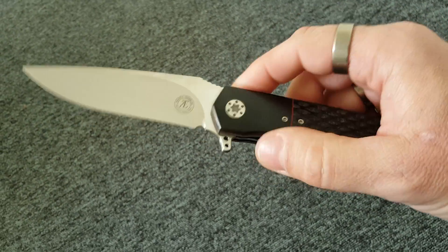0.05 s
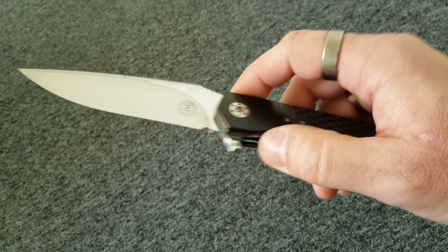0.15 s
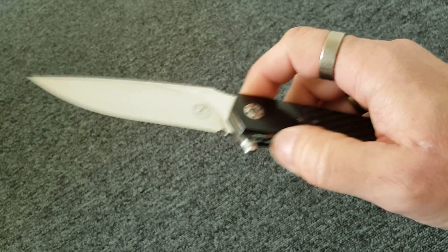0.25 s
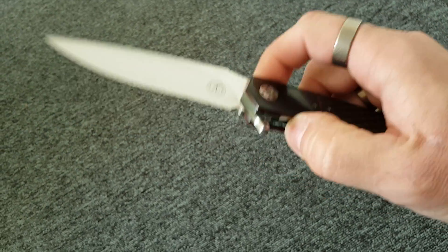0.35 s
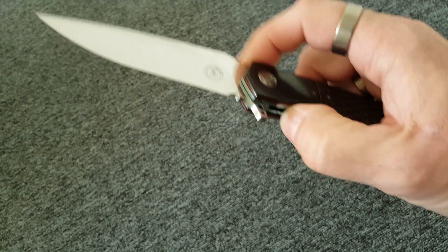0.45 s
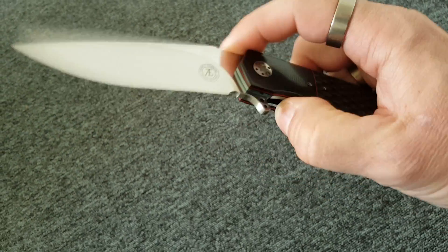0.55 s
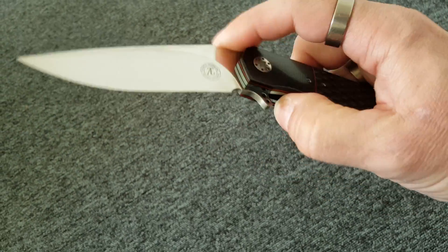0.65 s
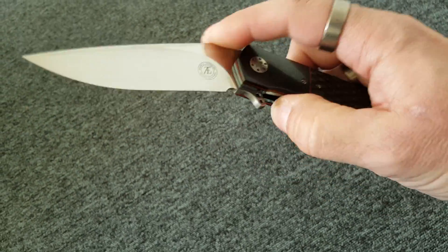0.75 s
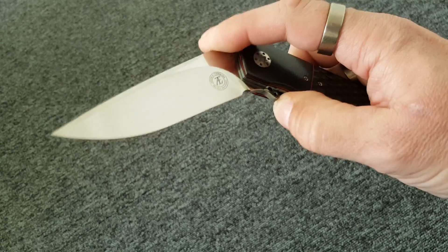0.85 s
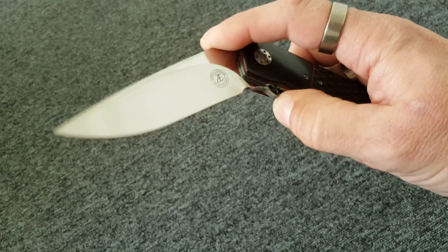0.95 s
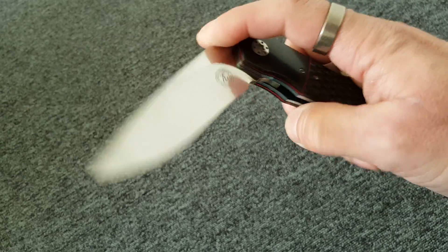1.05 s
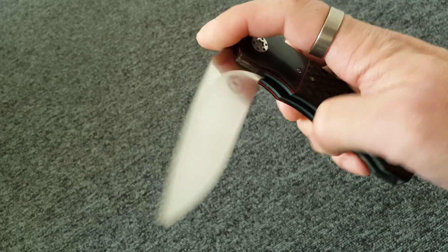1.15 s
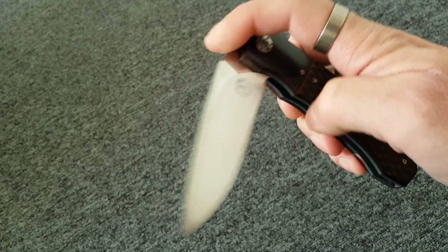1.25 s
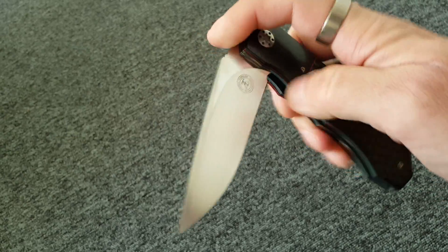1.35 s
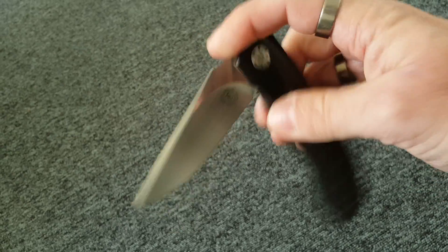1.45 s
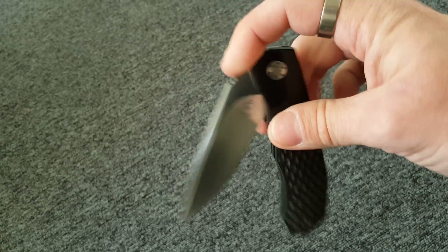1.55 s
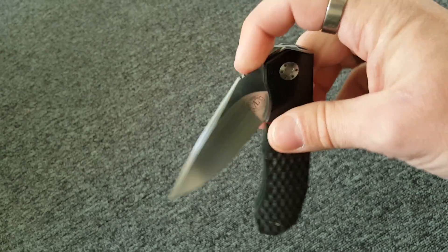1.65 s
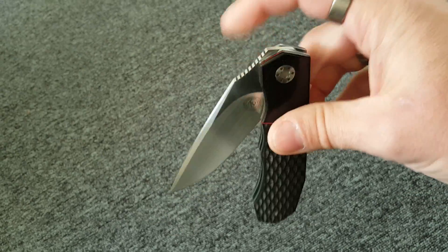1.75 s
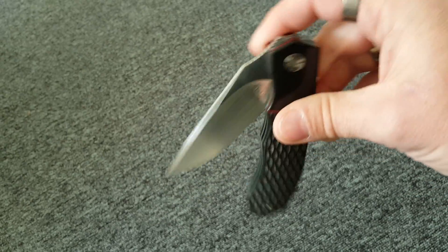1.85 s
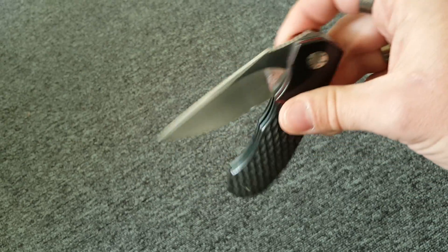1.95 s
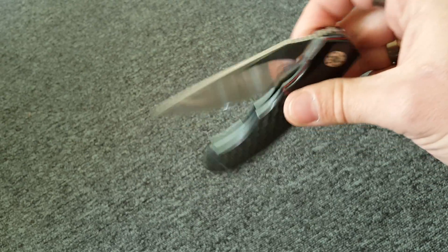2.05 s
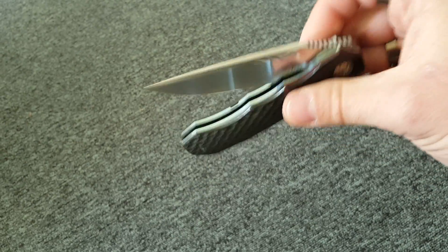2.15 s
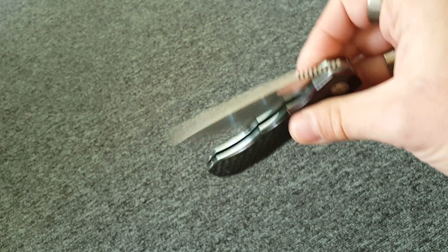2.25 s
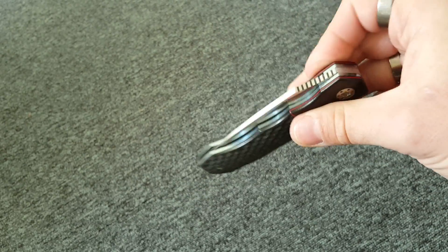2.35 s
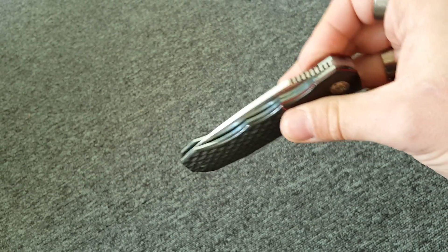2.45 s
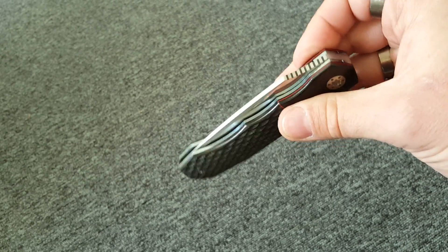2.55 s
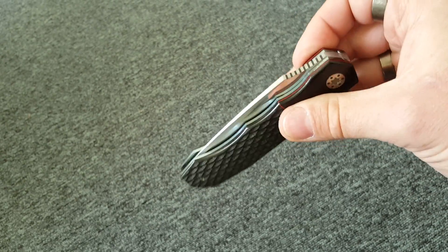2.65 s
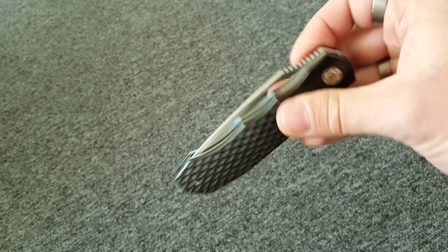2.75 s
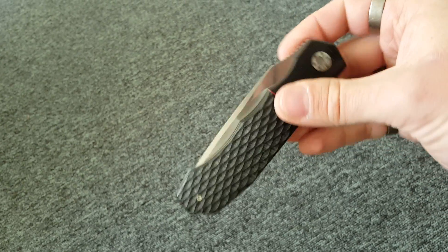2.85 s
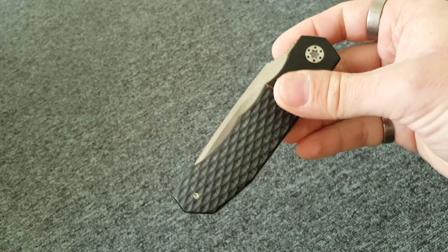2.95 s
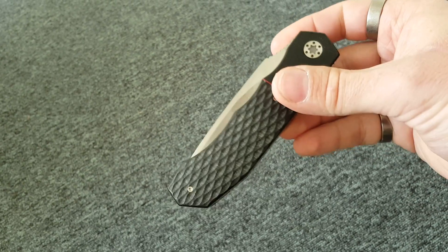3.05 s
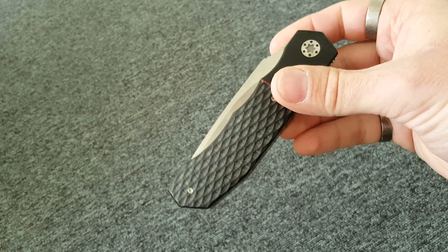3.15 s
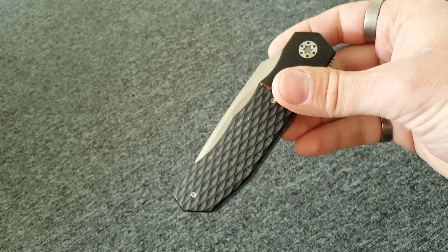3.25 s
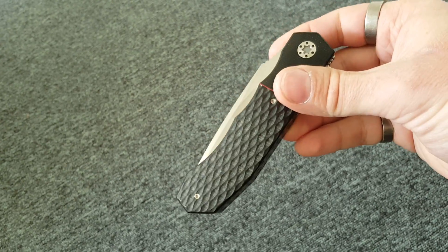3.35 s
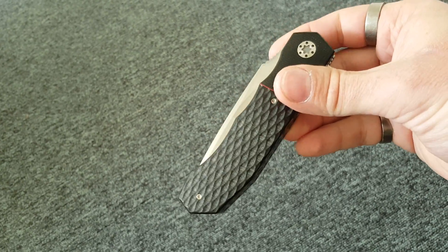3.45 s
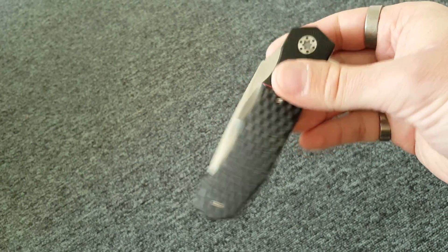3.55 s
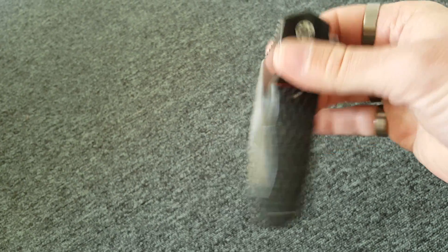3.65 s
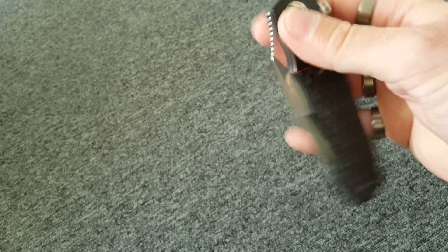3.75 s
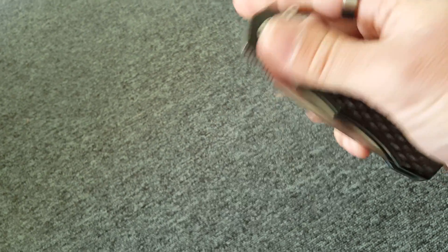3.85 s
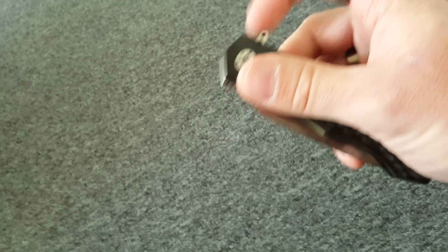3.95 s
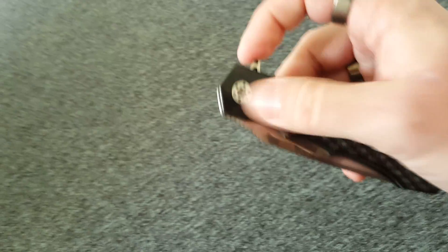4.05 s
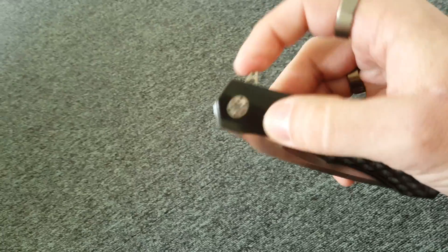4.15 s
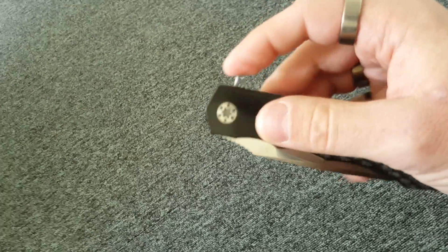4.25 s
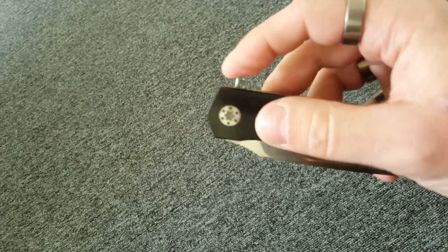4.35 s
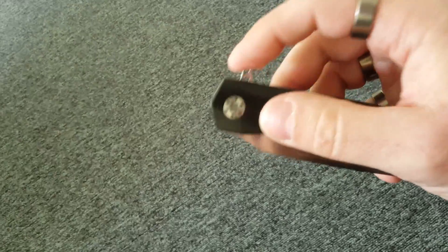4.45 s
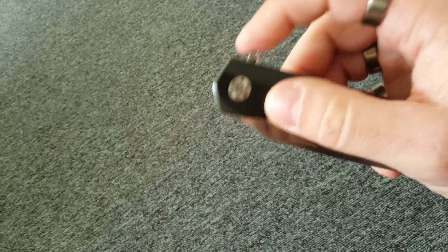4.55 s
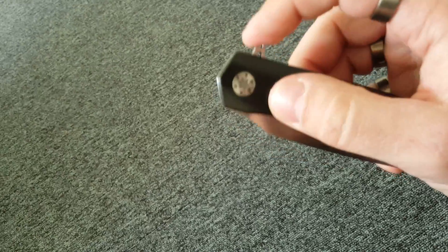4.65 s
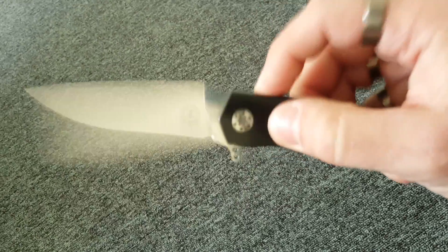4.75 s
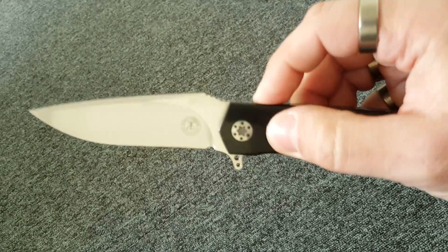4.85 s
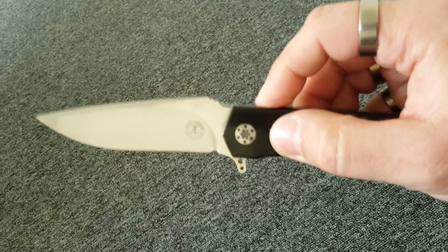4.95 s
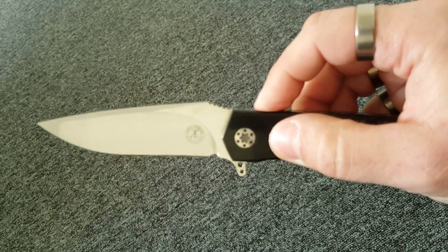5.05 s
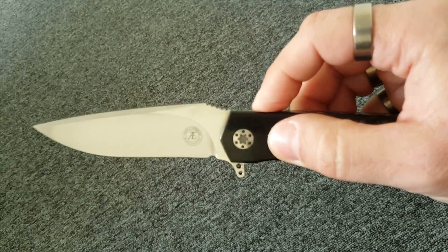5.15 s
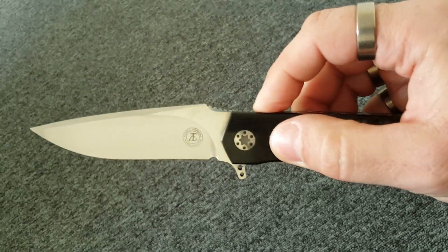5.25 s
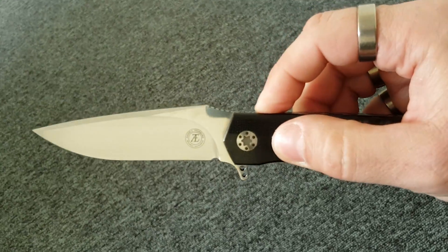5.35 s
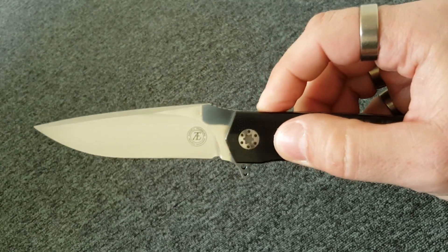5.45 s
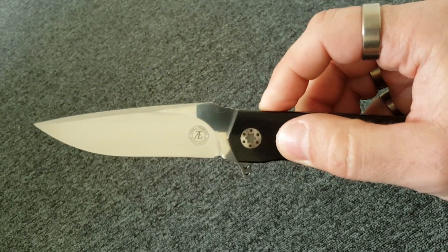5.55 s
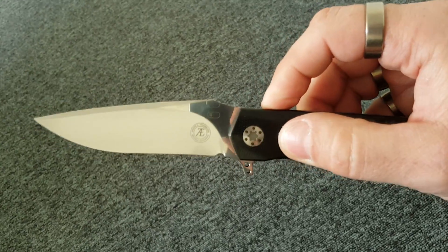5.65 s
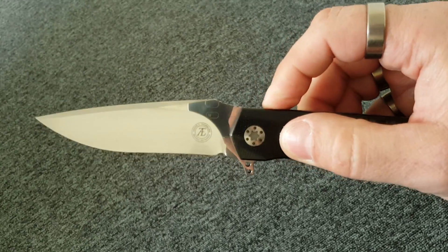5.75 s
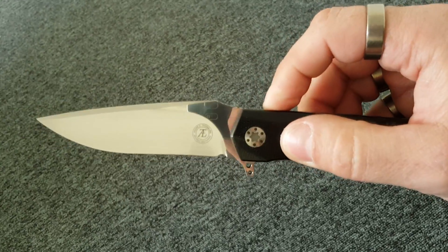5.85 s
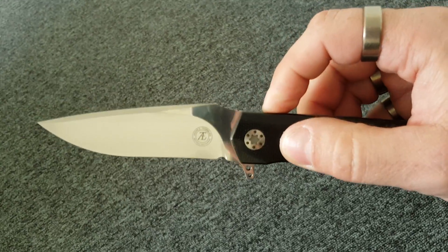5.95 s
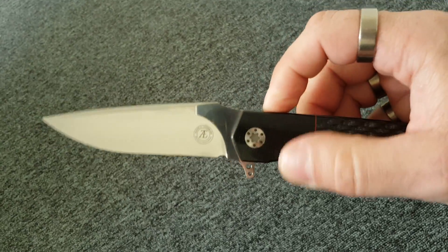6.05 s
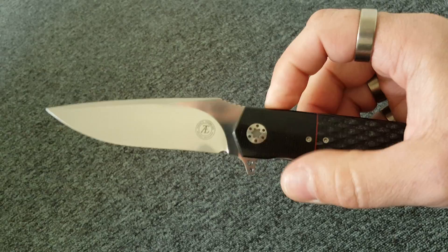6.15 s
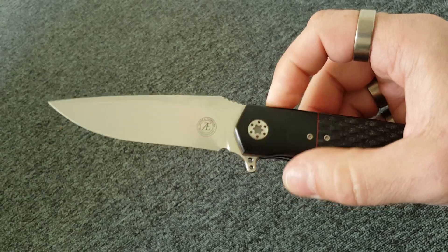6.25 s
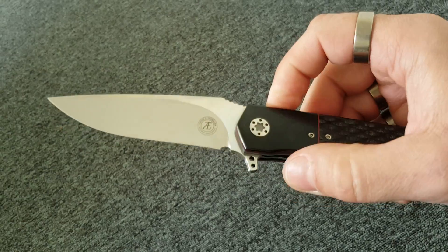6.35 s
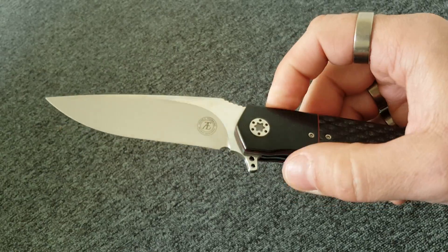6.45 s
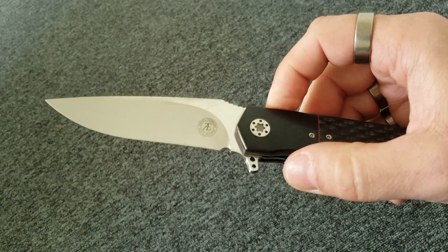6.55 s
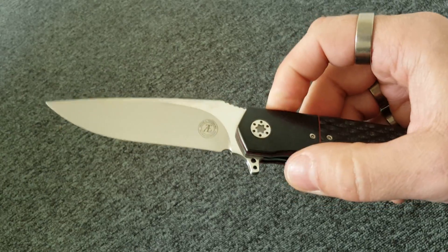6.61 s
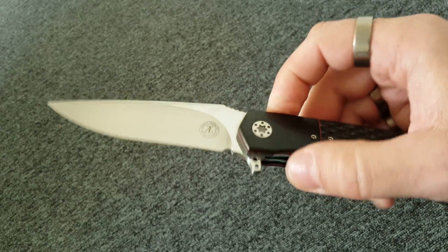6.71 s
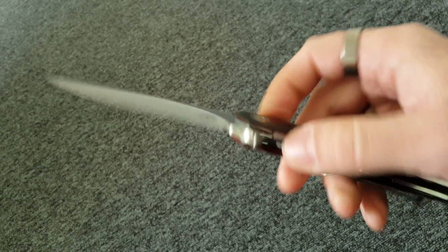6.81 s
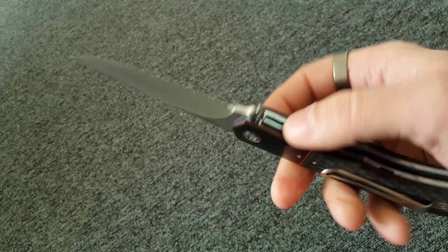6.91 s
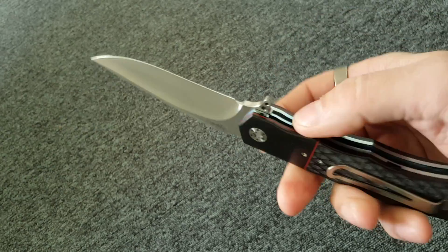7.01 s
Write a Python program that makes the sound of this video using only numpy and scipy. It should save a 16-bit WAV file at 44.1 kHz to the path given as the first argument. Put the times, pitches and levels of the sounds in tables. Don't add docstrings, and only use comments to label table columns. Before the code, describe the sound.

A quiet carpeted room carries soft low rumble, faint hiss and a distant machine hum whose low drone surges unevenly. Very near the stereo microphone, faint skin rubs and tiny nail ticks come first; at about 0.6 s a small, dry metallic click frees a folding knife's lock. A short slide ends in a light scuff at 1.05 s, followed by faint rubbing. At 2.4 s the blade shuts with a bright, rattly cluster of clacks within about a hundredth of a second. Quiet room until 3.7 s, when grip shifts bring small rubs and ticks, with a sharper tick at 4.1 s. A brief swish leads into the loudest event at 4.8 s: a hard, piercing steel snap with rapid chatter and a short room tail. The background then drops in level, recovering after about 5.5 s, with faint finger ticks from 6.3 to 7 s.

```python
import sys
import numpy as np
from scipy import signal
from scipy.fft import rfft, irfft, next_fast_len
from scipy.io import wavfile

SR = 44100
rng = np.random.default_rng(int(sys.argv[2]) if len(sys.argv) > 2 else 0)


def how_loud(loudness_db):
    steps = np.asarray(loudness_db, float) / 20
    return 10 ** steps


def master(y):
    cut = np.clip(np.atleast_2d(y).T, -1, 1)
    pcm = np.round(cut * 32767)
    wavfile.write(sys.argv[1], SR, pcm.astype(np.int16))


N = 312228

# f/Hz, density/dB
AIR = [(14, -13.5), (25, -1.5), (50, -1.5), (100, -1.5), (150, -5.5), (250, -6.5), (400, -15.5), (800, -20),
       (1600, -27), (3200, -36.5), (6300, -47), (10000, -49), (13000, -46.5), (15800, -44)]
# f/Hz, correlation [-1 to 1]
LIKENESS = [(60, 0.96), (150, 0.94), (380, 0.67), (950, 0.084), (2380, -0.09), (5980, 0.25), (15000, 0.31)]
# f/Hz, level/dB
AIR_BALANCE = [(60, -1.5), (240, -0.5), (950, 1), (3770, 0), (15000, 0.5)]
AIR_DB, AIR_TOP_HZ = -46, 15900
# f/Hz, width/Hz, rms level/dB
BOOMS = [(38, 16, -60.5), (67, 7.5, -57.5), (120.5, 14, -61), (650, 110, -69)]
# middle t/s, length/s, level/dB
SURGES = [(0.043, .08, -56.5), (.21, 0.072, -56.5), (0.324, 0.11, -52.5), (0.541, .1, -53),
          (0.837, 0.12, -54), (1.025, .15, -60), (1.162, 0.089, -56), (1.403, 0.076, -63),
          (1.627, 0.25, -58.5), (1.858, 0.21, -65.5), (2.263, 0.21, -51.5), (2.54, 0.084, -54.5),
          (2.708, 0.12, -52), (2.948, .16, -50.5), (3.3, 0.085, -58), (3.54, .1, -58), (3.704, 0.063, -54),
          (3.95, 0.11, -51), (4.13, 0.14, -52), (4.489, 0.2, -53), (4.71, .15, -55.5), (5.001, 0.19, -56.5),
          (5.283, 0.15, -55.5), (5.8, 0.24, -49.5), (6.055, 0.19, -54), (6.258, 0.12, -51.5),
          (6.62, 0.38, -54), (6.917, 0.075, -48), (7.03, .08, -50)]
DRONE_HZ, DRONE_WANDER_HZ, DRONE_FLOOR_DB = 181.8, 1.8, -61.5
HUM_HZ, HUM_DB, HUM_WOBBLE_DB = 292.6, -58, -0.92

# f/Hz, t60/s
ROOM_T60 = [(500, .3), (2000, 0.63), (4700, .5), (8000, 0.41), (15000, .2)]
EARLY_START_S, EARLY_T60_S, EARLY_DB = .008, .06, 8.5

# t/s, peak level/dB, centre f/Hz, left-right level/dB
KNOCKS = [
    (.2009, -52, 3850, 4),
    (3.7903, -53.5, 3520, 1),
    (3.8227, -51, 3500, 1),
    (4.4294, -60.5, 3600, 0.5),
    (4.7565, -44, 3900, 0),
    (6.0594, -62, 3640, -3),
    (6.8059, -49.5, 3690, 2),
]
SCUFFS = [
    (1.051, -39, 3580, 2),
    (1.052, -46, 1310, -3),
    (1.056, -51, 7040, 11),
]
RING_TICKS = [(.4414, -65, 9000, 0), (1.5854, -62.5, 12200, 0), (3.6424, -56, 11040, 0),
              (3.8846, -40.5, 10320, 1), (3.9944, -59, 11500, 0), (4.04, -63, 9900, 2.5),
              (6.3294, -60.5, 10020, 1), (6.4294, -62, 11000, 0), (6.6564, -64.5, 9020, 0),
              (6.8058, -49, 11500, 3), (7.0194, -58, 11100, 0.5)]
NAIL_TICKS = [(.4909, -44.5, 2500, 5), (.5104, -57.5, 6000, 2), (.5305, -53, 2190, 1),
              (.7114, -51, 5000, 0), (.7574, -52, 2600, 0), (.7906, -51, 4940, 0), (.8564, -56, 8000, 0),
              (1.9054, -52.5, 10000, 5), (4.0194, -57, 5500, 0), (4.093, -26, 10000, 1),
              (4.0926, -30.5, 4070, -14.5), (4.0926, -42.5, 1720, 11), (4.7556, -40, 1900, -7)]
# (width/octaves, decay/ms)
KNOCK, SCUFF, RING_TICK, NAIL_TICK = (0.12, 2.3), (0.47, 4.8), (0.77, .55), (3.1, .6)

# start t/s, end t/s, handle level/dB, rustle level/dB, handle f/Hz
RUBS = [(0.022, .13, -76, -77, 3710), (0.131, .22, -84, -82.5, 3622), (0.822, .91, -73, -80, 3720),
        (1.059, 1.108, -75, -81, 3730), (1.12, 1.2, -71.5, -82, 3680), (1.321, 1.4, -72, -88, 3624),
        (1.42, 1.572, -75, -79.5, 3750), (1.552, 1.669, -77, -83, 3680), (3.699, 3.843, -77, -89, 3463),
        (3.846, 3.881, -65, -69.5, 3347), (3.881, 3.917, -69.5, -68.5, 3586), (4.11, 4.154, -91, -77, 3700),
        (4.199, 4.319, -78.5, -79, 3514), (4.34, 4.4, -66, -80, 3590), (6.81, 6.9, -76.5, -76, 3580)]
# start t/s, end t/s, final handle level/dB, final rustle level/dB, handle f/Hz
SLIDES = [
    (.55, .59, -65, -82, 3807),
    (1.03, 1.052, -59.5, -69, 3700),
]
SLIDE_GROWTH_DB, SLIDE_EARLY = 21, 1.7
# start t/s, end t/s, handle level/dB, rustle level/dB, first f/Hz
SWINGS = [
    (2.307, 2.391, -69.5, -86.5, 3704),
    (4.726, 4.797, -56.5, -66.5, 3595),
]
SWING_START_S, SWING_CLIMB = .012, (-.03, 0.17)
# f/Hz, width/Hz, level/dB
RUSTLE = [(5200, 990, -6), (6900, 110, 1.5), (9200, 700, -2), (12600, 310, -2.5), (14000, 2500, -11.5)]
HANDLE_CORE_HZ, HANDLE_SKIRT_HZ, HANDLE_SKIRT_DB = 220, 1900, -8.5

# t/s, peak level/dB, chatter length/ms
UNLOCK = [
    (.5966, -38, .4),
    (.5971, -29, .6),
    (.6115, -52, 1.5),
]
SHUT = [
    (2.3921, -19, .4),
    (2.3933, -19, .8),
    (2.3957, -25, .9),
    (2.4018, -21, .6),
    (2.4035, -25, 1.2),
]
SNAP = [
    (4.8041, -20, .6),
    (4.8066, -27, .9),
    (4.8095, -28, 1.1),
    (4.811, -13, .7),
    (4.8122, -7, .7),
    (4.8133, -9, .6),
    (4.8147, -16, .5),
]
# f/Hz, level/dB, t60/s, extra level toward the walls/dB
UNLOCK_MODES = [(910, -14, 0.0053, -3), (1540, -25, 0.011, -7), (3770, 0, 0.0082, -3),
                (4540, 6.5, 0.0043, -3.5), (7240, -4, 0.0025, 8), (8470, -6, 0.022, -0.5),
                (11780, 0, 0.013, -8), (15070, -8, 0.0055, 0)]
SHUT_MODES = [(403, -20.5, 0.012, -10.5), (1200, -24.5, 0.014, -6), (1545, -10, 0.013, -4.5),
              (2270, -5.5, 0.0031, -11.5), (3257, -3, 0.013, -7), (3730, -1, 0.017, -7.5),
              (4200, -0.5, 0.007, -7.5), (4830, -1, 0.0097, -1.5), (6200, -11, 0.012, 1),
              (6800, -5, 0.017, -8), (8470, -16, 0.006, 7.5), (9340, -12.5, 0.00795, 4),
              (11500, -13.5, 0.012, -0.5), (12300, -12.5, 0.0055, -4), (14970, -11.5, 0.0035, -2)]
SNAP_MODES = [(345, -33.5, .008, -8), (681, -29.5, 0.0028, -9), (1540, -31, 0.0056, -8.5),
              (2150, -23.5, 0.0057, -2.5), (3279, -3, 0.011, -1.5), (3900, -4, 0.0094, -5),
              (4710, 1, 0.006, -4), (4700, -38.5, 0.45, -0.5), (4700, -16.5, 0.017, 6),
              (5940, -9, 0.0035, 3), (6900, -6.5, .014, -5), (7800, -19, .006, 2.5), (8435, -14.5, .04, -4),
              (9680, -8, 0.0023, 1.5), (12610, -19, .004, 0), (14800, -13.5, .003, -2)]
# level/dB, share of chatter heard by one port only [0-1], bare crack/dB, room/dB
UNLOCK_PATH, SHUT_PATH, SNAP_PATH = (0.5, 1, 0.5, -14.5), (1, 0.5, 0.5, -9), (2.5, 1, -4.5, -6)
CHATTER_DB = -5.5
CRACK_HZ = (1540, 13700)
LEFT_LAG_MS, PAN_DB = (.03, .33, .33), (1, 0, -1)
LEFT_BODY_DB, LEFT_BODY_HZ = 7, 2000

GAIN_DB, DUCK_DB, DUCK_ATTACK_S, RECOVER_AT_S, RECOVER_S = 2, 8, 0.077, .72, .17


def rms_one(x):
    return x / np.sqrt(np.mean(x ** 2) + 1e-20)


def at_hz(points, hz):
    points_hz, values = np.array(points).T
    return np.interp(np.log(np.maximum(hz, 1)), np.log(points_hz), values)


def band(x, low_hz, high_hz):
    edges = [low_hz, min(high_hz, .45 * SR)]
    return signal.sosfilt(signal.butter(2, edges, "band", fs=SR, output="sos"), x)


def resonate(x, hz, width_hz):
    r = np.exp(-np.pi * width_hz / SR)
    poles = [1, -2 * r * np.cos(2 * np.pi * hz / SR), r * r]
    return signal.lfilter([(1 - r * r) / 2, 0, (r * r - 1) / 2], poles, x)


def ring(x, hz, t60):
    r, w = how_loud(-60 / (t60 * SR)), 2 * np.pi * hz / SR
    return signal.lfilter([0, np.sin(w)], [1, -2 * r * np.cos(w), r * r], x + 1e-18)


def drift(rate):
    return rms_one(np.interp(np.arange(N) * rate / SR, np.arange(200), rng.standard_normal(200)))


def air():
    size = next_fast_len(N)
    hz = np.fft.rfftfreq(size, 1 / SR)
    colour = how_loud(at_hz(AIR, hz)) * (hz > 12) * (hz < AIR_TOP_HZ)
    mid, side = rfft(rng.standard_normal((2, size))) * colour
    alike = np.clip(at_hz(LIKENESS, hz), -1, 1)
    pan = how_loud(at_hz(AIR_BALANCE, hz) / 2)
    shared, own = np.sqrt(1 + alike) * mid, np.sqrt(1 - alike) * side
    pair = np.array([(shared + own) * pan, (shared - own) / pan])
    return how_loud(AIR_DB - 6.5) * rms_one(irfft(pair, size)[:, :N])


def hum():
    t = np.arange(N) / SR
    tone = how_loud(HUM_DB + HUM_WOBBLE_DB * drift(9)) * np.sin(2 * np.pi * HUM_HZ * t + .25 * drift(4))
    noise = rng.standard_normal(N + SR)
    booms = np.zeros(N)
    for hz, width_hz, db in BOOMS:
        stirred = resonate(resonate(noise, hz, width_hz), hz, width_hz)
        booms += how_loud(db) * rms_one(stirred[SR:])
    surges = np.full(N, how_loud(DRONE_FLOOR_DB))
    for middle, length, db in SURGES:
        surges += how_loud(db) * np.exp(-np.abs((t - middle) / (0.48 * length)) ** 2.5)
    drone = surges * np.sin(2 * np.pi * np.cumsum(DRONE_HZ + DRONE_WANDER_HZ * drift(8)) / SR)
    return np.sqrt(2) * tone * how_loud([[.3], [-.3]]) + (np.sqrt(2) * drone + booms) * how_loud([[-.7], [.7]])


def room_answer():
    t = np.arange(SR * 2 // 3) / SR
    edges = 300 * 2 ** np.arange(0, 6.5, .5)
    white = rng.standard_normal((2, 2, len(t)))
    out = np.zeros((2, len(t)))
    for k, (low, high) in enumerate(zip(edges, edges[1:])):
        t60 = at_hz(ROOM_T60, np.sqrt(low * high))
        out += band(white[k % 2], low, high) * how_loud(-60 * t / t60)
    early = 1 + how_loud(EARLY_DB - 60 * np.maximum(t - EARLY_START_S, 0) / EARLY_T60_S)
    out *= early * np.clip(t / EARLY_START_S, 0, 1) ** 2
    return unit_energy(out)


def unit_energy(x):
    return x / np.sqrt(np.sum(x ** 2, axis=1, keepdims=True))


def ticks():
    length = 1200
    t, out = np.arange(length) / SR, np.zeros((2, N + length))
    kinds = (KNOCKS, KNOCK), (SCUFFS, SCUFF), (RING_TICKS, RING_TICK), (NAIL_TICKS, NAIL_TICK)
    for rows, (octaves, ms) in kinds:
        half = 2 ** (octaves / 2)
        for s, db, hz, pan_db in rows:
            burst = rng.standard_normal((2, length)) * np.exp(-1000 * t / ms)
            tick = band(burst, hz / half, hz * half)
            tick /= np.abs(tick).max(axis=1, keepdims=True)
            at = round(s * SR)
            out[:, at:at + length] += how_loud(db + np.array([[.5], [-.5]]) * pan_db) * tick
    return out[:, :N]


def strokes():
    t, levels, handle_hz = np.arange(N) / SR, np.zeros((2, N)), np.zeros(N)

    def add(row, shape_of, climb=0):
        start, end, handle_db, rustle_db, hz = row
        inside = (t >= start) & (t < end)
        since = t[inside] - start
        way = since / (end - start)
        levels[:, inside] += how_loud([[handle_db], [rustle_db]]) * shape_of(since, way)
        handle_hz[inside] = hz * (1 + climb * way)

    for row in RUBS:
        add(row, lambda since, way: np.sin(np.pi * way))
    for row in SLIDES:
        add(row, lambda since, way: how_loud(-SLIDE_GROWTH_DB * (1 - way) ** SLIDE_EARLY))
    for row, climb in zip(SWINGS, SWING_CLIMB):
        add(row, lambda since, way: 1 - np.exp(-since / SWING_START_S), climb)
    return levels, handle_hz


def rubs(grain_db):
    unevenness = rng.standard_normal(N // 64 + 1).repeat(64)[:N]
    grains = rng.standard_normal((3, 2, N)) * how_loud(grain_db * unevenness)
    core = rms_one(band(grains[0], 6.9, HANDLE_CORE_HZ))
    skirt = rms_one(band(grains[1], 6.9, HANDLE_SKIRT_HZ))
    levels, handle_hz = strokes()
    carrier = np.cos(2 * np.pi * np.cumsum(handle_hz) / SR)
    dull = rms_one((core + how_loud(HANDLE_SKIRT_DB) * skirt) * carrier)
    bright = np.zeros((2, N))
    for k, (hz, width_hz, db) in enumerate(RUSTLE):
        bright += (-1) ** k * how_loud(db) * resonate(grains[2], hz, width_hz)
    return np.sqrt(2) * (levels[0] * dull + levels[1] * rms_one(bright))


def to_ports(left, right, lag_ms, pan_db):
    hz = np.fft.rfftfreq(len(left), 1 / SR)
    body = how_loud(LEFT_BODY_DB / (1 + (hz / LEFT_BODY_HZ) ** 4))
    delay = np.exp(-2j * np.pi * hz * lag_ms / 1000)
    late = irfft(rfft(left) * body * delay, len(left))
    return np.array([late * how_loud(pan_db / 2), right * how_loud(-pan_db / 2)])


def contact_force(contacts, start, length, level_db):
    t, force = np.arange(400) / SR, np.zeros((3, length))
    for s, db, ms in contacts:
        at = round(s * SR) - start
        chatter = how_loud(CHATTER_DB) * rng.standard_normal((3, 400)) * np.exp(-3000 * t / ms)
        chatter[:, 0] = 1
        force[:, at:at + 400] += how_loud(db + level_db) * unit_energy(chatter)
    return force


def action(contacts, modes, path, lag_ms, pan_db, room):
    level_db, own, crack_db, room_db = path
    start, length = round(contacts[0][0] * SR) - 64, SR * 2 // 3
    force = contact_force(contacts, start, length, level_db)
    blow = np.zeros(length)
    blow[np.argmax(np.abs(force[0]))] = np.sqrt(np.sum(force[0] ** 2))
    force = np.vstack([np.sqrt(1 - own) * force[0] + np.sqrt(own) * force[1:], blow])
    rings = np.zeros((3, length))
    for k, (hz, db, t60, wall_db) in enumerate(modes):
        rings += (-1) ** k * how_loud(db + np.array([[0], [0], [wall_db]])) * ring(force, hz, t60)
    crack = 2 * how_loud(crack_db) * band(force, *CRACK_HZ)
    left, right, walls = band(rings, 250, 21000) + crack
    echo = signal.fftconvolve(walls[None], room)[:, :length]
    return start, to_ports(left, right, lag_ms, pan_db) + how_loud(room_db) * echo


def knife(room):
    out = np.zeros((2, N))
    all_contacts, all_modes = (UNLOCK, SHUT, SNAP), (UNLOCK_MODES, SHUT_MODES, SNAP_MODES)
    paths = UNLOCK_PATH, SHUT_PATH, SNAP_PATH
    for how in zip(all_contacts, all_modes, paths, LEFT_LAG_MS, PAN_DB):
        start, sound = action(*how, room)
        out[:, start:start + sound.shape[1]] += sound
    return out


def scene():
    room = room_answer()
    hands = ticks() + rubs(grain_db=3.0)
    echo = signal.fftconvolve(hands.mean(axis=0)[None], room)[:, :N]
    return air() + hum() + hands + how_loud(-23) * echo + knife(room)


def gain_control():
    since = np.maximum(np.arange(N) / SR - SNAP[-1][0], 0)
    sink = 1 - np.exp(-since / DUCK_ATTACK_S)
    recover = 1 + np.exp((since - RECOVER_AT_S) / RECOVER_S)
    return how_loud(GAIN_DB - DUCK_DB * sink / recover)


def low_pass(x):
    return signal.sosfilt(signal.butter(12, 16290, fs=SR, output="sos"), x)


def record(dry):
    return low_pass(np.clip(dry * gain_control(), -1, 1))


dry = scene()
out = record(dry)
master(out)
```